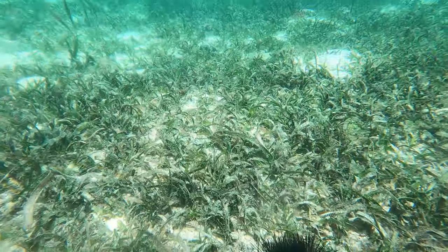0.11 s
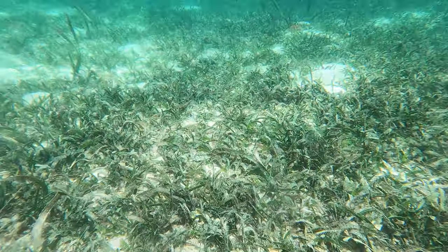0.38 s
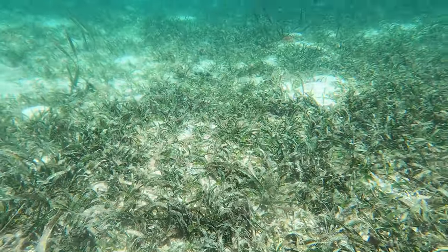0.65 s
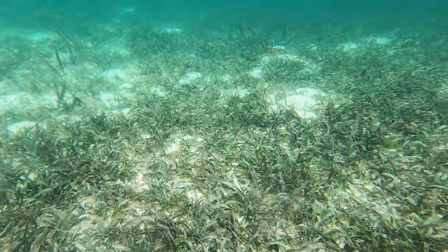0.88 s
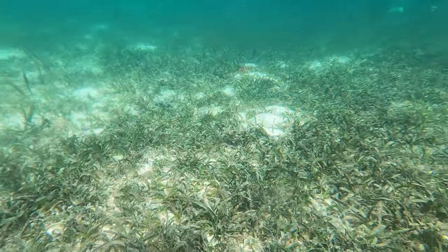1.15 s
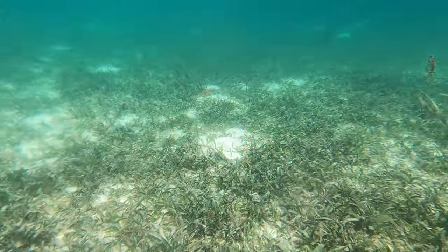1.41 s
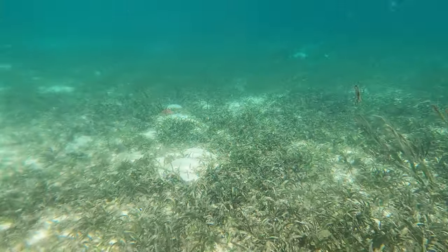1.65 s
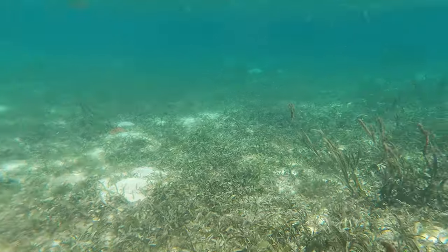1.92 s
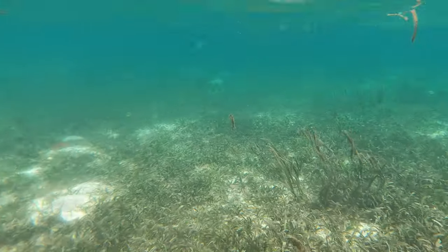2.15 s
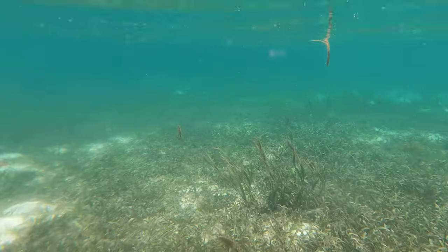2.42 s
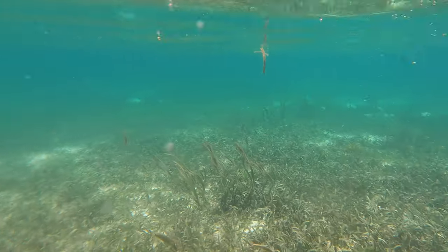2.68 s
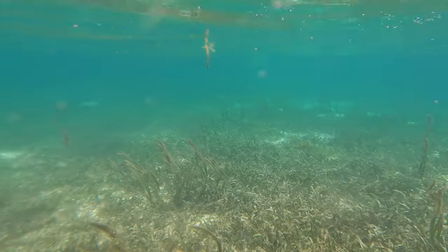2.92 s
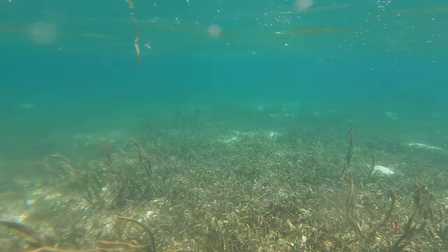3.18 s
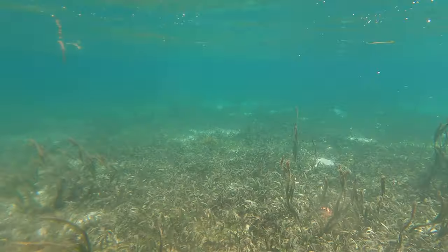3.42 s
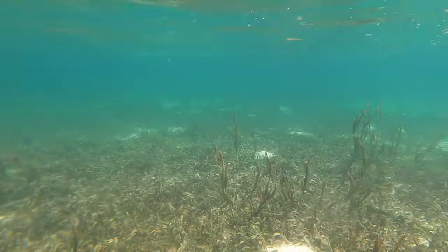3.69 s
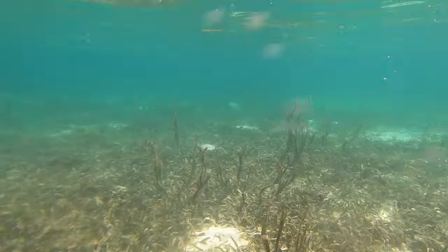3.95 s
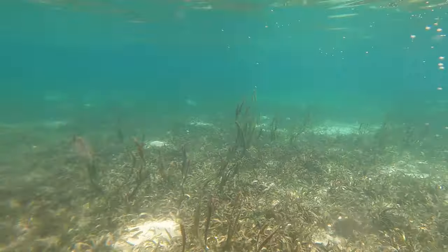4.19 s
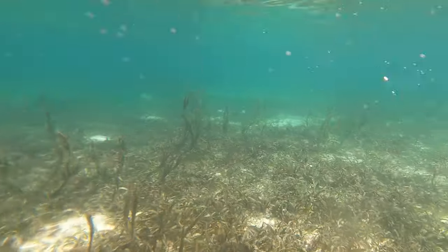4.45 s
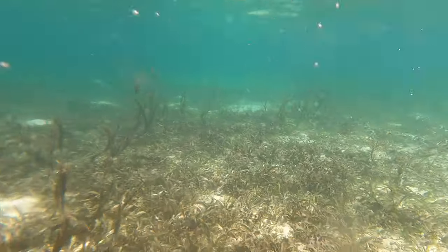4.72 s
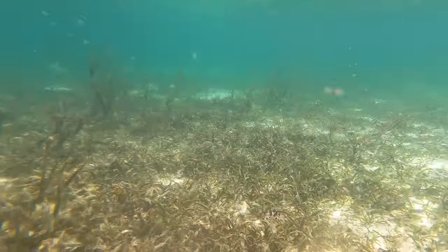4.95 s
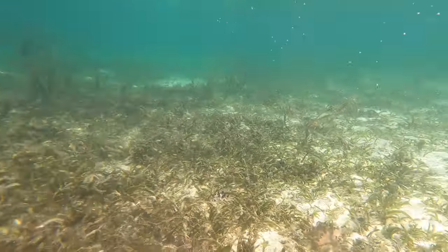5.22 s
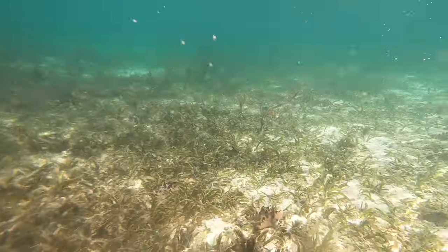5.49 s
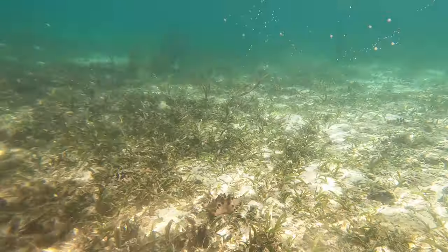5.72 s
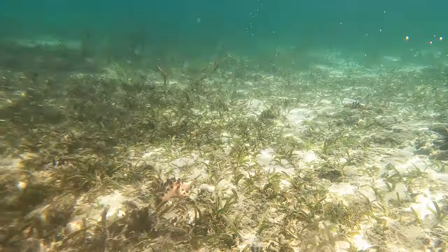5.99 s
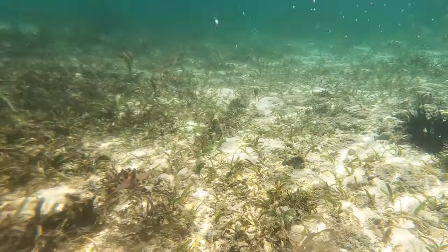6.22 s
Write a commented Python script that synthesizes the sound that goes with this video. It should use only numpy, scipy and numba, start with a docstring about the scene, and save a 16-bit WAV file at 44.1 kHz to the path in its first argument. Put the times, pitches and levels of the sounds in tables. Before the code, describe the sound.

Muffled underwater rumble and surging swish around a sealed camera, with bubble pings, taps, one hard thud and hollow rubbing strokes.

```python
"""Under the sea, over sea grass: a swimmer carries a small camera in a sealed housing.
Water pushed past the housing rumbles, swishes and hisses: noise shaped in bands that flicker and surge.
A hand rubs and knocks the shell: noise through its resonances, swelling tones and dying low notes.
Small bubbles ping as short decaying sines, and far shrimp crackle in the hiss as very short ones."""
import sys
import numpy as np
from scipy import signal
from scipy.fft import rfft, irfft
from scipy.io import wavfile
from scipy.ndimage import uniform_filter1d
from numba import njit

SR = 44100
rng = np.random.default_rng(int(sys.argv[2]) if len(sys.argv) > 2 else 0)


def to_wav(sig):
    """Store sig (one row per channel, or 1-D mono) as 16-bit WAV at the path in sys.argv[1].

    Samples outside -1..1 are clipped; the rate is SR.
    """
    pcm = np.clip(np.atleast_2d(sig), -1, 1) * 32767
    pcm = np.round(pcm).astype(np.int16)
    wavfile.write(sys.argv[1], SR, pcm.T)  # frames by channels


def gain_from_db(level_db):
    """Turn a decibel level (scalar or array-like) into a linear amplitude factor."""
    decades = np.asarray(level_db, float) / 20
    return 10 ** decades


N = 280476
T = np.arange(N) / SR  # seconds
HZ = np.fft.rfftfreq(N, 1 / SR)
OPPOSITE = np.array([[1], [-1]])  # left and right signs of a sound that differs between the ports


def unit(x):
    """Scales a sound to rms 1."""
    return x / np.sqrt(np.mean(x ** 2))


def pan(db):
    """Left and right gains for a left minus right level in dB."""
    return gain_from_db(np.array([[db], [-db]]) / 2)


def follow(points):
    """A value that moves in straight lines through (seconds, value) points."""
    return np.interp(T, *np.transpose(points))


def walk(rate):
    """A random level, drawn about rate times a second and smoothed twice; spread 1."""
    hold = int(SR / rate)
    steps = np.repeat(rng.standard_normal(N // hold + 1), hold)
    smooth = uniform_filter1d(uniform_filter1d(steps, hold), hold)
    return unit(smooth[:N])


def colour(points):
    """Gain at every frequency from (Hz, dB) points."""
    hz, db = np.transpose(points)
    return gain_from_db(np.interp(np.log(HZ + 1), np.log(hz), db, left=-120, right=-120))


def churn(points, side_db, flicker_db, rate):
    """Coloured noise whose half-octave bands flicker separately; a weaker noise differs between the ports."""
    both = rfft(rng.standard_normal((2, N))) * colour(points)
    octave = np.log2(HZ + 1)
    lowest, highest = np.log2(points[0][0]), np.log2(points[-1][0])
    out = 0
    for centre in np.arange(lowest, highest + .5, .5):
        band = np.clip(1 - 2 * abs(octave - centre), 0, 1)
        mid, side = irfft(both * band, N)
        flicker = gain_from_db(flicker_db * walk(rate))
        out = out + flicker * (mid + gain_from_db(side_db) * side * OPPOSITE)
    return unit(out)


def ring(x, modes):
    """Sends x through resonances of (Hz, width Hz, dB), neighbours in opposite phase."""
    out = 0
    for k, (hz, width, db) in enumerate(modes):
        b, a = signal.iirpeak(hz, hz / width, SR)
        out = out + (-1) ** k * gain_from_db(db) * signal.lfilter(b, a, x)
    return out


@njit
def sweep(x, hz, width):
    """State-variable band-pass whose centre moves; gain 1 at the centre."""
    y, b, l = np.empty(len(x)), 0., 0.
    for i in range(len(x)):
        g, k = np.tan(np.pi * hz[i] / SR), width / hz[i]
        v = (b + g * (x[i] - l)) / (1 + g * (g + k))
        b, l, y[i] = 2 * v - b, l + 2 * g * v, k * v
    return y


def add(out, s, sound):
    """Mixes a short sound in at s seconds."""
    i = int(s * SR)
    n = min(sound.shape[-1], N - i)
    out[:, i:i + n] += sound[..., :n]


def ping(hz, t60, rise, glide):
    """A sine with a soft start that dies by 60 dB in t60 seconds, its pitch gliding; peak 1."""
    t = T[:int(t60 * SR) + 99]
    tone = np.sin(2 * np.pi * hz * t * (1 + glide * t / t60))
    y = tone * (1 - np.exp(-t / rise)) ** 2 * 1000. ** (-t / t60)
    return y / abs(y).max()


# Tone of the far hiss. Each row: frequency in Hz, relative level in dB per Hz.
FAR_COLOUR = [(1880, -38), (3200, -1.5), (3650, -1.5), (4130, -5), (4550, -5.5), (4960, -4), (5730, -8),
              (6780, 0), (8270, -16.5), (9070, -12.5), (10800, -31), (14100, -60), (22000, -120)]
# Loudness of the far hiss over time. Each row: time in seconds, level in dB.
FAR_LEVEL = [(0.0, -67), (1.84, -69.5), (2.3, -74), (3.17, -69), (4.39, -70), (4.96, -69.5), (6.36, -68)]


def far_hiss():
    """A steady, high, far-off hiss: wide noise with slowly flickering bands."""
    return gain_from_db(follow(FAR_LEVEL)) * churn(FAR_COLOUR, side_db=-6.0, flicker_db=2.0, rate=10.0)


def crackle():
    """Far shrimp and tiny bubbles: a few cycles each, mostly faint, some louder."""
    out = np.zeros((2, N))
    per_second = 140
    for when, pitch, size, side in rng.random((int(per_second * N / SR), 4)):
        hz = 4300 * 2 ** (1.35 * pitch)
        db = -68 - 5.35 * np.log(size + 0.051) - 5.0 * np.log2(hz / 4000)
        click = ping(hz, 30 / hz, rise=0.00025, glide=0.013)
        add(out, when * T[-1], pan(8 * (side - .5)) * gain_from_db(db) * click)
    return out


# Two narrow bands that sing out at times.
# Each row: time in seconds, level in dB near 1.2 kHz, level in dB near 4.6 kHz.
SING_LEVELS = [(0, -71, -83), (1.301, -70.5, -86), (3, -75, -86.5), (4.6, -74, -79.5), (4.9, -70.5, -76),
               (5.35, -69, -77), (5.7, -68.5, -76), (6.1, -63, -73.5), (6.36, -63.5, -71.5)]


def sing():
    """Noise in two narrow resonances of the shell, each wavering in level."""
    s, *columns = np.transpose(SING_LEVELS)
    out = 0
    for db, hz, width_hz in zip(columns, (1210., 4585), (90., 230)):
        mode = [(hz, width_hz, 0)]
        band = ring(ring(rng.standard_normal(N), mode), mode)
        out = out + gain_from_db(np.interp(T, s, db) + 1.7 * walk(25.)) * unit(band)
    return out


# Tone of the rumble. Each row: frequency in Hz, relative level in dB per Hz.
RUMBLE_COLOUR = [(7.1, -35.5), (12, 1.5), (30, -5), (50, -3), (78, -13.5), (105, -16), (119, -33.5),
                 (145, -34), (160, -59), (210, -81.5), (350, -120)]


def rumble():
    """Eddies press on the whole housing: slow bass noise, nearly the same at both ports."""
    return churn(RUMBLE_COLOUR, side_db=-52, flicker_db=1.87, rate=11.0)


# Tone of the swish. Each row: frequency in Hz, relative level in dB per Hz.
SWISH_COLOUR = [(71, -38.5), (120, -10.5), (129, -16.5), (172, -3.5), (220, -3), (365, -1.5), (429, -5.5),
                (465, -8.5), (520, -25), (590, -24.5), (813, -36.5), (900, -32.5), (1170, -63.5),
                (1980, -120)]
# A hollow note in the swish that moves. Each row: time in seconds, pitch in Hz, share added to the swish.
HOLLOW_NOTE = [(0, 346, 1.4), (.4, 278.4, 2.4), (.62, 275, 2.1), (1.6, 258.6, 0.45), (2.1, 378, 0.4),
               (2.6, 341.5, 0.81), (2.701, 319, 4.2), (3.149, 317.4, 5.3), (3.3, 274, 0.35),
               (3.65, 355, 1.4), (4.298, 369, 1), (4.5, 297, 0.21), (5.3, 344, 0.35), (5.801, 300, 0.59),
               (6.36, 300, .9)]


def swish():
    """Finer turbulence: mid-range noise with a moving narrow resonance that gives it a hollow note."""
    wash = churn(SWISH_COLOUR, side_db=-26.5, flicker_db=3.0, rate=33.0)
    s, hz, share = np.transpose(HOLLOW_NOTE)
    note_hz = np.interp(T, s, hz)
    note = np.array([sweep(port, note_hz, 9.5) for port in wash])
    return unit(wash + np.interp(T, s, share) * note)


# Tone of the near hiss. Each row: frequency in Hz, relative level in dB per Hz.
HISS_COLOUR = [(470, -43.5), (800, -29), (953, -4), (1080, -10), (1160, -5), (1220, -9), (1860, -1),
               (2080, -7), (2410, -1), (2630, -3.5), (3160, -13), (3660, -13), (4000, -17.5), (5200, -42.5),
               (8800, -120)]
# What the shell rings with; the hiss, the taps and the strokes all use it.
# Each row: pitch in Hz, width in Hz, strength in dB.
SHELL_MODES = [(212.5, 11, -3), (300, 53, -10.5), (369, 21.2, -6), (432, 64, -7.5), (562, 56, 10.5),
               (988, 130, 0.5), (1250, 145, 9), (1620, 180, 7.5), (2040, 133, 4.5), (2605, 120, 5.5),
               (2960, 580, -3.5), (3950, 170, -1), (4400, 500, -13)]


def hiss():
    """The finest turbulence comes through the walls, so the upper modes of the shell stand out in it."""
    fine = churn(HISS_COLOUR, side_db=-9.0, flicker_db=3.5, rate=88.0)
    return unit(fine + 1.7 * ring(fine, SHELL_MODES[6:]))


# Water past the housing, before its quick surges.
# Each row: time in seconds, rumble in dB, swish in dB, hiss in dB.
FLOW_LEVELS = [(0.0, -23, -35, -50.5), (.075, -30, -41, -60), (0.12, -20.5, -47, -62.5),
               (.3, -28.5, -50.5, -66), (0.451, -25, -42, -58.5), (0.62, -26, -48, -65),
               (1.25, -26.5, -50, -64), (1.52, -28, -50, -67), (1.679, -25, -40.5, -59),
               (2.099, -28, -52, -66.5), (2.28, -23.5, -48, -61), (2.58, -23, -53, -58.5),
               (2.67, -27.5, -50.5, -66.5), (3.22, -22.5, -55, -64), (3.55, -26.5, -48.5, -68),
               (3.779, -19.5, -44, -64.5), (4.159, -20, -46.5, -66.5), (4.599, -26.5, -45, -65),
               (4.85, -19, -49, -61.5), (5.03, -28, -46.5, -63), (5.33, -23, -44.5, -63),
               (5.37, -23, -42, -59.5), (5.55, -25.5, -39.5, -58.5), (5.72, -31.5, -39.5, -57.5),
               (5.8, -26, -43.5, -59.5), (5.91, -26, -43, -61), (6.36, -25, -39.5, -58.5)]


def water():
    """Rumble, swish and hiss follow the flow and swell together in quick surges, each by its own share."""
    s, *columns = np.transpose(FLOW_LEVELS)
    surge_db = 2 * walk(24)
    out = 0
    for layer, db, surge_share in zip((rumble(), swish(), hiss()), columns, (.6, .8, .3)):
        out = out + gain_from_db(np.interp(T, s, db) + surge_share * surge_db) * layer
    return out


# Small bubbles at random moments: a sparse scatter throughout, then short dense runs.
# Each row: start in seconds, end in seconds, number of bubbles, level of the loudest possible in dB,
# lowest pitch in Hz, highest pitch in Hz.
FIZZ_SPANS = [(0., 6.3, 18, -59, 1050, 4000), (.03, .19, 14, -54, 1150, 3300),
              (.36, .48, 8, -55, 1150, 2400), (.8, .885, 40, -53, 1300, 3000),
              (.6, .68, 8, -57, 1400, 3200), (.94, 1.09, 10, -57, 1200, 3600),
              (1.62, 1.74, 8, -55, 1300, 3000), (3.2, 3.37, 18, -60, 1150, 3700),
              (4.77, 4.88, 12, -58, 1400, 3200)]


def fizz():
    """Small bubbles come at random moments and sizes within each span, each sagging in pitch."""
    out = np.zeros((2, N))
    for start, end, count, db, low, high in FIZZ_SPANS:
        for when, pitch, size, side in rng.random((int(count), 4)):
            hz = low * (high / low) ** pitch
            note = ping(hz, 55 / hz, rise=0.0014, glide=-0.027)
            level = pan(8 * (side - .5)) * gain_from_db(db - 7.2 * size)
            add(out, start + when * (end - start), level * note)
    return out


# Short high notes: single bubbles, and ringing notes that sound along with some taps.
# Each row: start in seconds, peak in dB, pitch in Hz, time to die by 60 dB in seconds, left minus right in dB.
HIGH_NOTES = [(0.079, -50, 2840, 0.011, 0), (.108, -36, 2710, 0.024, 0), (.108, -46, 3580, 0.027, -7),
              (0.121, -41, 2280, 0.023, -3), (.385, -55, 2320, 0.06, -4), (.555, -54, 1190, .07, -4),
              (0.246, -51.5, 5300, 0.01, -2), (0.27, -48, 1620, 0.055, 1), (0.64, -47, 3030, 0.0091, 3.5),
              (0.64, -37.5, 1765, 0.046, -1), (0.799, -43, 2260, 0.023, -2),
              (0.816, -46.5, 3400, 0.022, -8), (0.829, -36, 1780, 0.034, -2), (0.84, -45, 1680, 0.036, 1),
              (.867, -52, 2700, .012, -5), (.879, -49, 2020, 0.011, 0), (0.831, -31, 2400, 0.024, -2),
              (0.867, -42, 1650, 0.059, 0), (0.873, -41.5, 2150, 0.012, 0), (0.962, -56, 6530, 0.014, -1),
              (1.002, -43.5, 1705, 0.055, -2), (1.122, -45.5, 5180, 0.008, -2),
              (1.254, -47.5, 1230, 0.11, 2), (1.34, -50, 4600, 0.019, -1), (1.567, -50.5, 2270, 0.026, -6),
              (1.624, -44, 2480, 0.0046, -16), (1.622, -45, 1420, 0.069, 1),
              (1.721, -38.5, 2080, 0.0077, 0), (1.984, -49, 1230, 0.1, 2), (1.971, -58, 8040, 0.0076, -6),
              (2.264, -52.5, 2960, 0.0126, 2), (2.375, -43.5, 1665, 0.096, 5),
              (2.504, -49, 4570, 0.0081, 4), (2.78, -56.5, 587.9, .15, 0), (2.869, -50.5, 1310, 0.065, 0),
              (3.101, -49, 2970, 0.0059, -0.5), (3.208, -51.5, 1300, 0.08, 1),
              (3.206, -56, 3580, 0.027, -1), (3.213, -51, 2710, .025, -3), (3.224, -55, 2160, 0.027, 0),
              (3.25, -53.5, 1500, 0.026, 0), (3.256, -48.5, 2600, 0.022, -5), (3.277, -56, 2620, .02, -2),
              (3.286, -51.5, 2620, .02, -3), (3.298, -53, 2080, 0.036, -1), (3.3, -55, 3000, .015, -1),
              (3.307, -62, 1210, 0.04, 8), (3.325, -51, 1760, 0.067, 0), (3.351, -57, 3060, 0.04, 0),
              (3.322, -56, 3020, .01, 0), (3.97, -55, 4880, 0.011, 3), (4.194, -55, 6930, 0.011, -1.5),
              (4.31, -45, 2930, 0.015, -2), (4.355, -58.5, 1044, 0.096, -8),
              (4.747, -56.5, 1210, 0.069, 11), (4.763, -40.5, 2682, 0.022, -4),
              (4.764, -51, 3500, 0.011, -7), (4.764, -55.5, 4500, .014, -4), (4.766, -47.5, 2290, 0.02, -3),
              (4.776, -56, 1850, .02, 6), (4.782, -52, 1620, 0.042, 1), (4.808, -55, 4470, .015, -1),
              (4.714, -59, 3598, .015, -6), (4.709, -53.5, 1810, .015, 0), (4.986, -47, 2750, .012, 1),
              (4.989, -45, 3070, 0.012, 1), (4.99, -52, 3670, .01, -1), (5.421, -54, 8830, 0.0049, 4),
              (5.395, -51.5, 1180, 0.15, 3), (5.43, -49, 1273, 0.095, 2), (5.629, -60, 1204, 0.087, 2),
              (5.705, -47.5, 1830, 0.01, 4), (5.272, -55, 2630, 0.029, -4), (5.82, -49.5, 2620, 0.03, 1),
              (5.901, -43.5, 2040, 0.02, 3), (6.042, -42.5, 950, .03, 1), (6.042, -34, 1250, 0.027, 4),
              (6.338, -52.5, 3100, 0.016, -2), (5.5, -49, 1760, 0.045, 0), (5.98, -49, 2730, 0.022, 0),
              (6.072, -49, 1665, 0.047, 7), (6.272, -50, 1760, 0.048, 3)]


def high_notes():
    """Bubbles and ringing notes die away as sines, a wobble in level making each a little rough."""
    out = np.zeros((2, N))
    wobble = gain_from_db(3.2 * walk(450.))
    for s, db, hz, t60, pan_db in HIGH_NOTES:
        note = ping(hz, t60, rise=0.001, glide=-0.0071)
        note = note * wobble[int(s * SR):][:len(note)]
        add(out, s, pan(pan_db) * gain_from_db(db) * note / abs(note).max())
    return out


# Dry snaps near the right port. Each row: start in seconds, level in dB, left minus right at the start in dB.
DRY_SNAPS = [(0.731, -25, -12.5), (0.922, -24.5, -14.5), (2.052, -30.5, -13)]


def snaps():
    """A pressure step whose swing slows as it goes; the sharp edge leans right, the slow tail reaches both."""
    out, t = np.zeros((2, N)), T[:4000]
    slowing = -np.cos(4.5 * np.log(1 + t / .001))
    swing = slowing * (1 - np.exp(-t / .0001)) * np.exp(-t / .009)
    edge = np.sin(2 * np.pi * 4300 * t) * np.exp(-t / 0.000047)
    for s, db, pan_db in DRY_SNAPS:
        lean = pan(pan_db * np.exp(-t / .0012))[..., 0, :]  # evens out between the ports
        add(out, s, gain_from_db(db) * (lean * swing + 0.73 * pan(pan_db) * edge))
    return out


# Taps that ring the shell. Each row: start in seconds, body peak in dB, treble tick peak in dB,
# left minus right in dB.
SHELL_TAPS = [(0.0121, -31, -35, 0.5), (0.1079, -28.5, -42.5, 0), (0.428, -44, -58, 0),
              (0.83, -42, -44.5, -2), (0.9516, -47, -45, -0.5), (1.6238, -36, -64, 4), (1.72, -42, -51, -5),
              (2.052, -58, -47.5, 2), (2.503, -47, -48.5, -4), (3.2092, -51, -56.5, 1),
              (4.765, -58, -56, -10), (4.987, -54, -60, -1.5), (5.702, -40.5, -63, 1),
              (6.0408, -30, -54, 3)]


def taps():
    """A short rattle into the upper modes of the shell, with a thin treble tick."""
    out, t = np.zeros((2, N)), T[:2000]
    for s, db, treble_db, pan_db in SHELL_TAPS:
        blow = rng.standard_normal((2, len(t))) * np.exp(-t / 0.0025) * (1 - np.exp(-t / 0.00035))
        body = ring(ring(blow[0], SHELL_MODES[6:10]), [(1790, 5300, 0)])
        tick = ring(ring(blow[1], [(4660, 2300, 0)]), [(4800, 4100, 0)])
        body = gain_from_db(db) * body / abs(body).max()
        tick = gain_from_db(treble_db) * tick / abs(tick).max()
        add(out, s, pan(pan_db) * (body + tick))
    return out


# Dull knocks of a soft hand.
# Each row: start in seconds, peak in dB, starting pitch in Hz, time to die by 60 dB in seconds.
SOFT_KNOCKS = [(0.214, -22.5, 283, 0.027), (.431, -40.5, 493, 0.0093), (1.8748, -18.5, 210, 0.14),
               (1.884, -29, 386, 0.054), (1.920, -8.5, 70.7, 0.06), (2.298, -18, 92.6, 0.11),
               (2.328, -22.5, 88.4, 0.19), (2.595, -28.5, 353, .06), (4.018, -26.5, 209.7, 0.13),
               (4.165, -26, 213, .08), (5.355, -32, 337, 0.035), (5.388, -33, 357, 0.14),
               (5.41, -30.5, 340, 0.073), (5.62, -37, 300, 0.058), (5.668, -32, 320, 0.051),
               (5.713, -29.5, 275, 0.044), (5.78, -32, 305, 0.061), (6.138, -33, 291, 0.097),
               (6.24, -33.5, 232, 0.098), (2.735, -43, 332, 0.21), (2.31, -31.5, 333, 0.14),
               (5.952, -27.5, 300, 0.02), (6.045, -24, 258, 0.024)]
# Hard low thuds.
# Each row: start in seconds, peak in dB, starting pitch in Hz, time to die by 60 dB in seconds.
HARD_THUDS = [(1.8826, -4, 75.5, 0.066), (2.2445, -13, 62.6, .14), (2.349, -20, 73.2, 0.082),
              (2.517, -19.5, 60.8, .1), (2.619, -22.5, 53.7, 0.16)]


def knocks():
    """A soft hand lands over part of a cycle, a hard blow at once; the pitch sags as the walls relax."""
    out = np.zeros((2, N))
    for rows, rise_cycles in ((SOFT_KNOCKS, 0.75), (HARD_THUDS, 0.12)):
        for s, db, hz, t60 in rows:
            add(out, s, gain_from_db(db) * ping(hz, t60, rise=rise_cycles / hz, glide=-0.079))
    return out


# Short swelling tones: judders of the rubbed shell, a knock's swell and low murmurs.
# Each row: centre in seconds, two thirds of the whole swell in seconds, peak in dB, pitch in Hz.
SWELLING_TONES = [(1.888, 0.0162, -39, 602), (2.232, .012, -26.5, 435), (2.243, .012, -21.5, 447),
                  (2.23, .008, -34, 694), (2.262, 0.0138, -23, 426), (2.39, 0.0098, -39.5, 660),
                  (2.6, .016, -37, 1230), (2.58, .016, -40, 1300), (2.524, 0.018, -34.5, 372),
                  (2.491, 0.023, -33.5, 433), (2.352, 0.023, -23, 428), (2.417, .05, -32, 440),
                  (3.997, .02, -32, 331), (3.675, 0.043, -39.5, 350), (4, .025, -38, 390),
                  (3.765, .035, -36.5, 400), (3.805, .02, -39, 360), (3.955, .025, -37.5, 400),
                  (1.91, .03, -26.5, 150), (4.015, .018, -20.5, 400), (4.031, .022, -14, 390),
                  (4.05, .018, -21.5, 380), (4.065, 0.023, -22, 380), (4.097, .017, -8.5, 385),
                  (4.118, .013, -9, 380), (4.135, .016, -14, 384), (4.03, .014, -38, 1084),
                  (4.1, 0.013, -34, 1046), (4.117, .018, -31, 924), (4.15, 0.016, -33, 1130),
                  (4.187, .02, -32, 1051), (4.198, .014, -41.5, 1970), (4.094, .03, -33.5, 603),
                  (4.157, .03, -32, 599), (4.148, .022, -22.5, 364), (4.162, .024, -22, 388.5),
                  (4.179, 0.01846, -19.5, 402), (4.202, 0.04, -24, 378.6)]


def swelling_tones():
    """Each tone swells and is choked again: a sine under a smooth hump."""
    out = np.zeros((2, N))
    for s, length, db, hz in SWELLING_TONES:
        t = T[:int(1.5 * length * SR)]
        hump = np.sin(np.pi * t / t[-1]) ** 2
        add(out, s - t[-1] / 2, gain_from_db(db) * hump * np.sin(2 * np.pi * hz * t))
    return out


# The main boom of the shell shifts with the grip. Each row: time in seconds, pitch in Hz.
BOOM_PITCH = [(1.9, 397), (2.2, 408), (2.25, 444), (2.32, 317), (2.36, 444), (2.5, 446), (2.55, 361),
              (3.9, 398), (4.03, 375.2), (4.1, 387), (4.22, 364)]
# Strokes of a hand on the shell, with a knock's short splash at 1.884 and a water swish at 2.855.
# Each row: moment of full strength in seconds, build-up in seconds, time held in seconds,
# then boom, drag, scrape and edge, each in dB at full strength.
STROKES = [(1.884, 0.0062, 0.0078, -38, -51, -57, -58.5), (2.07, 0.025, 0.096, -52, -61, -64, -90),
           (2.19, 0.055, 0.015, -48, -52, -56.5, -78), (2.235, 0.042, 0.018, -28.5, -46, -49.5, -71),
           (2.275, 0.024, 0.0075, -40, -54, -58, -80), (2.351, 0.045, 0.038, -35.5, -43.5, -50, -69),
           (2.42, .015, 0.046, -41, -47.5, -50.5, -65.5), (2.504, 0.03, 0.051, -38.5, -43, -50.5, -65),
           (2.575, .027, 0.025, -39.5, -50, -53, -66), (2.624, 0.024, 0.0077, -47.5, -55, -66, -75),
           (2.855, 0.021, 0.079, -74, -77, -54.5, -82), (3.864, 0.017, 0.018, -46, -53, -56, -67.5),
           (3.959, .026, 0.013, -60.5, -62, -55, -75), (4.005, 0.032, 0.061, -28, -41, -46.5, -49.5),
           (4.089, 0.023, 0.1, -26.5, -35.5, -43, -49)]


def strokes():
    """Noise rings four groups of shell modes, each mode in lumps of its own, and swells stroke by stroke."""
    slip = rng.standard_normal((2, N))
    slip = slip[0] + gain_from_db(-36.0) * slip[1] * OPPOSITE

    def lumpy(modes, lumps_db):
        """Rings each mode alone, with its own random swells."""
        return sum((-1) ** k * gain_from_db(lumps_db * walk(45.)) * ring(slip, [mode]) for k, mode in enumerate(modes))

    # boom, drag, scrape, edge: modes, centre in Hz and width in Hz of the group, depth of the lumps in dB
    groups = [(SHELL_MODES[:4], 370, 400, 3.6), (SHELL_MODES[4:6], 850, 700, 3.5),
              (SHELL_MODES[6:9], 1450, 1300, 3.0), (SHELL_MODES[9:], 3300, 3000, 2.2)]
    parts = [unit(ring(lumpy(modes, lumps_db), [(hz, width, 0)])) for modes, hz, width, lumps_db in groups]

    boom_hz, boom_width_hz, boom_share = follow(BOOM_PITCH), 27.3, 0.96
    boom = []
    for port in slip * gain_from_db(2.1 * walk(40.)):
        narrow = sweep(port, boom_hz, boom_width_hz)
        boom.append(sweep(narrow, boom_hz, 5.9 * boom_width_hz))
    parts[0] = unit(parts[0] + boom_share * unit(np.array(boom)))

    # the whole housing shakes with the boom, at a level set against it
    shake, shake_db = [(80, 45, 0)], -6.5
    parts.append(unit(ring(ring(slip, shake), shake)))

    build_db, let_go_s = 20, 0.023  # rise during the build-up; time to fall as far again, ever faster
    out = np.zeros((2, N))
    for s, build, held, boom_db, drag_db, scrape_db, edge_db in STROKES:
        before = np.minimum(T - s, 0) / build
        after = np.maximum(T - s - held, 0) / let_go_s
        swell = gain_from_db(build_db * (before - after ** 2))
        levels = (boom_db, drag_db, scrape_db, edge_db, boom_db + shake_db)
        out += swell * sum(gain_from_db(db) * part for part, db in zip(parts, levels))
    return out


def scene():
    """Adds up all the sounds that reach the two ports through the shell."""
    background = far_hiss() + crackle() + sing() + water()
    small_sounds = fizz() + high_notes() + snaps() + taps()
    return background + small_sounds + knocks() + swelling_tones() + strokes()


# Level difference of the two ports. Each row: frequency in Hz, left minus right in dB.
PORT_LEVEL = [(60, 0.13), (190, 0), (330, 0.4), (590, 3.5), (1050, 2.5), (1860, 3.5), (3310, -1),
              (5860, -0.9), (10400, 2)]
# Phase difference of the two ports. Each row: frequency in Hz, how far left leads in radians.
PORT_PHASE = [(0, 0.056), (1120, -0.79), (2240, -0.71), (2580, -0.95), (3190, -0.78), (3620, 0.8),
              (5940, -0.062), (6200, 0.19), (10600, 0.24)]


def two_ports(sound):
    """The ports colour and shift the sound differently: each takes half the difference, in opposite ways."""
    pad = 2048  # mirrored samples at each end, still in place on return
    sound = np.pad(sound, ((0, 0), (pad, pad)), "reflect")
    wide = np.fft.rfftfreq(N + 2 * pad, 1 / SR)
    hz, db = np.transpose(PORT_LEVEL)
    level = gain_from_db(np.interp(np.log(wide + 1), np.log(hz), db) / 2)
    lean = level * np.exp(.5j * np.interp(wide, *np.transpose(PORT_PHASE)))
    rounded = np.tanh(1.198 * sound) / 1.368  # the largest swings are rounded
    return irfft(rfft(rounded) * [lean, 1 / lean], N + 2 * pad), pad


def band_limit(x):
    """A steep low-pass at the top of the band."""
    return signal.sosfilt(signal.butter(12, 10990, fs=SR, output="sos"), x)


def record(dry):
    """The ports pick up the sound; the recorder cuts the top steeply; both ends fade over 4 ms."""
    ports, pad = two_ports(dry)
    top_cut = signal.butter(6, 11000, fs=SR, output="sos")
    dull = signal.sosfilt(top_cut, ports)[:, pad:-pad]
    fade = np.minimum(np.minimum(T, T[::-1]) / .004, 1)
    return band_limit(dull * fade)


dry = scene()
out = record(dry)
to_wav(out)
```